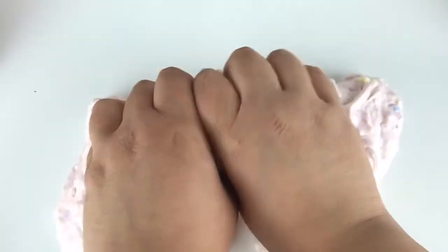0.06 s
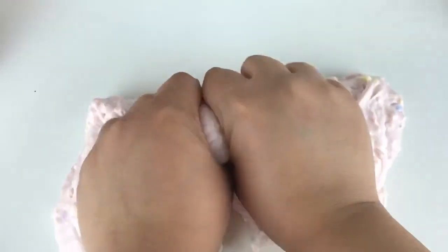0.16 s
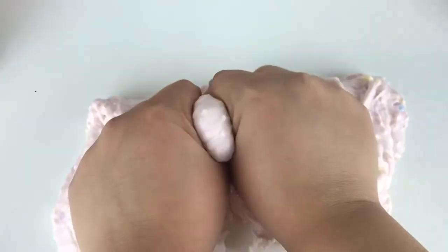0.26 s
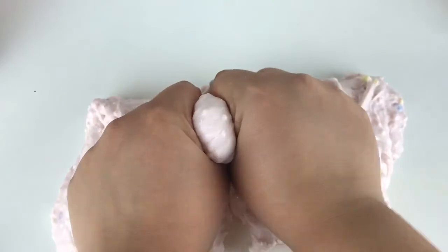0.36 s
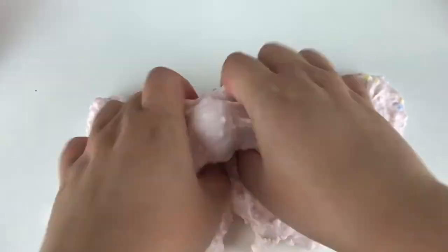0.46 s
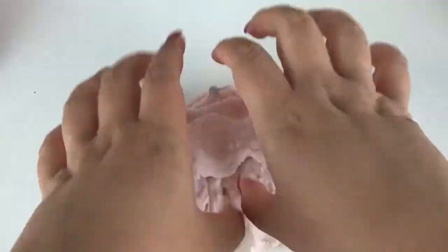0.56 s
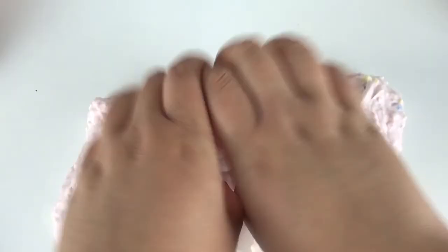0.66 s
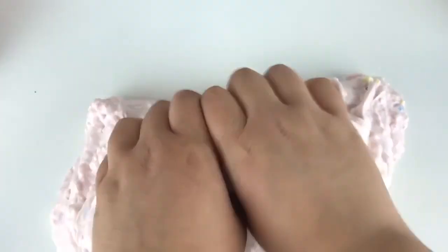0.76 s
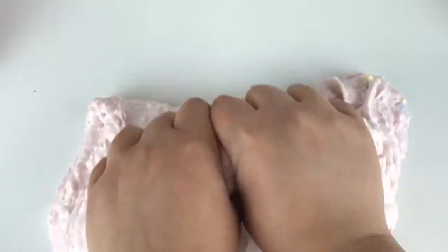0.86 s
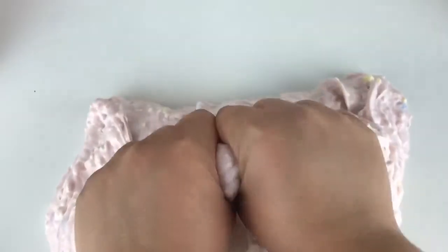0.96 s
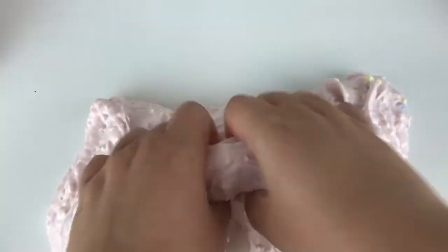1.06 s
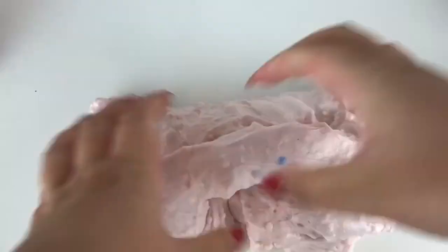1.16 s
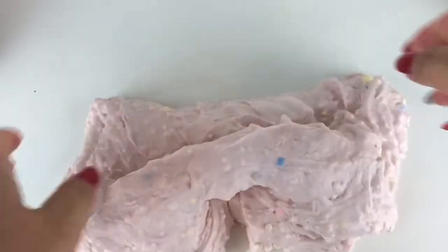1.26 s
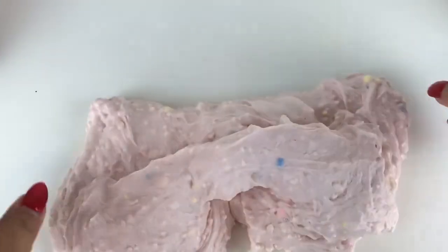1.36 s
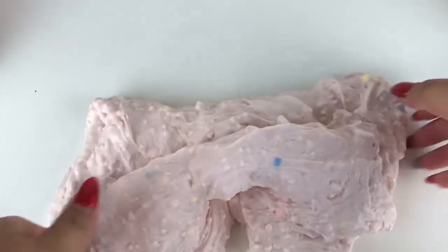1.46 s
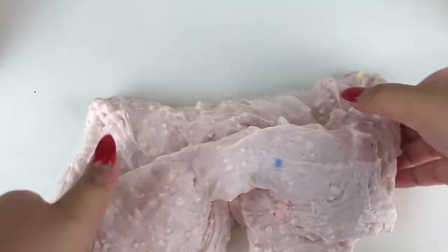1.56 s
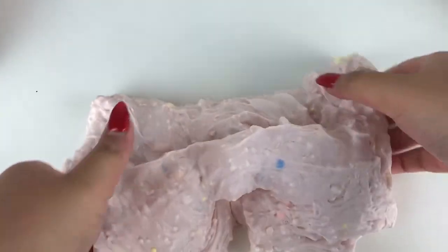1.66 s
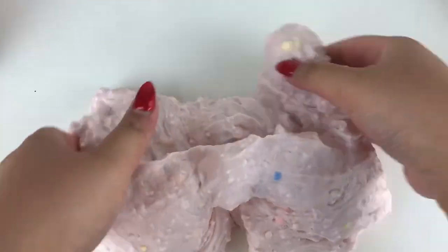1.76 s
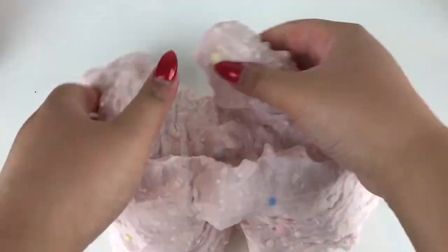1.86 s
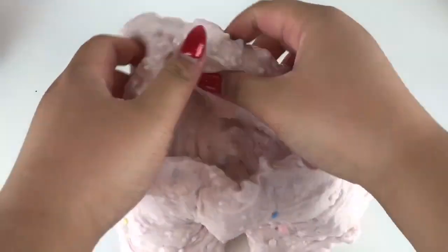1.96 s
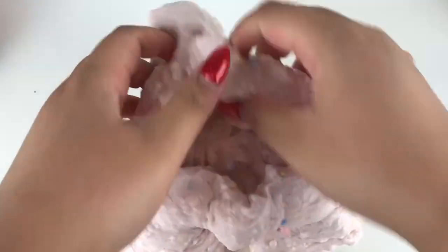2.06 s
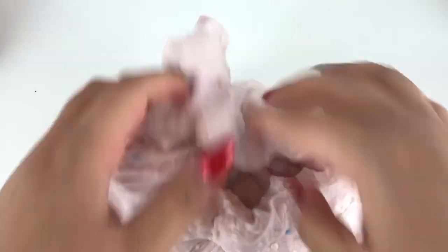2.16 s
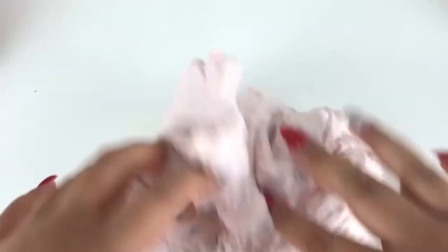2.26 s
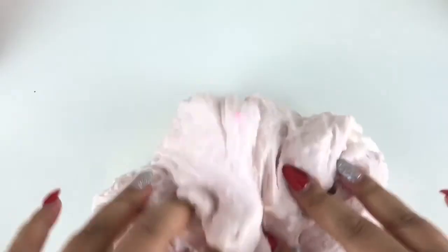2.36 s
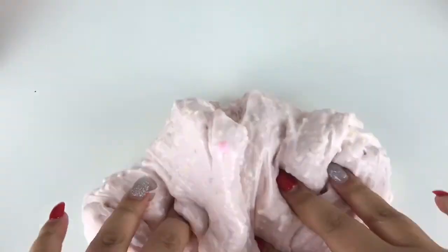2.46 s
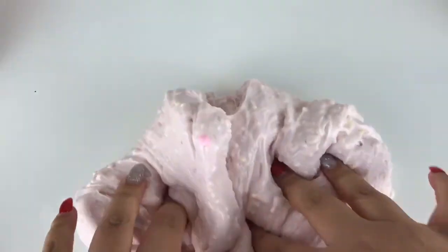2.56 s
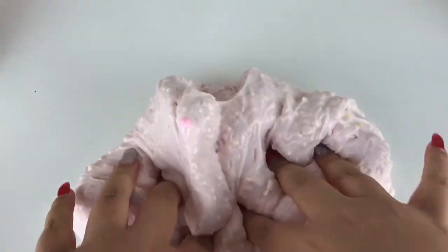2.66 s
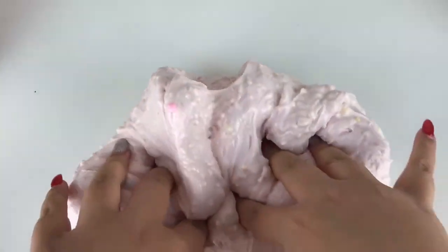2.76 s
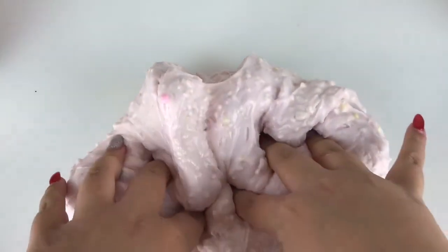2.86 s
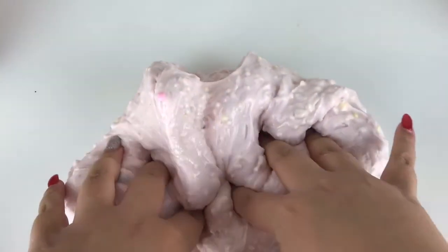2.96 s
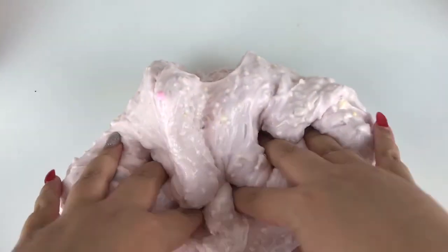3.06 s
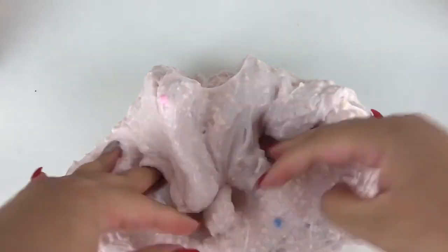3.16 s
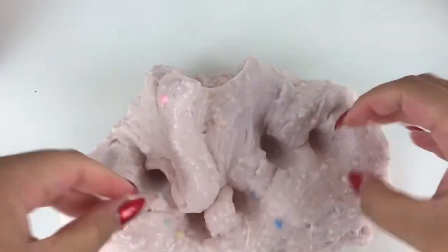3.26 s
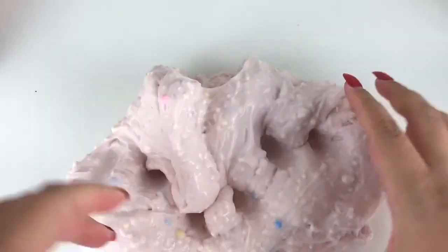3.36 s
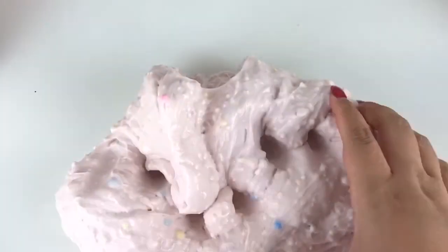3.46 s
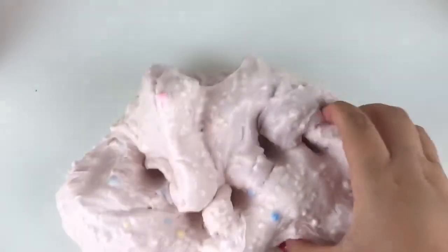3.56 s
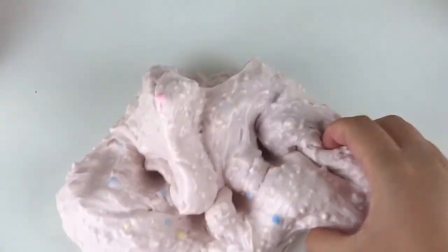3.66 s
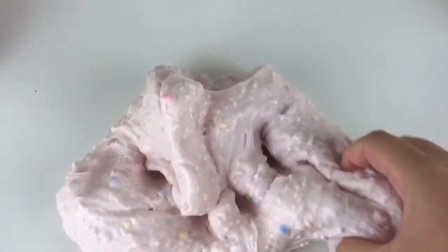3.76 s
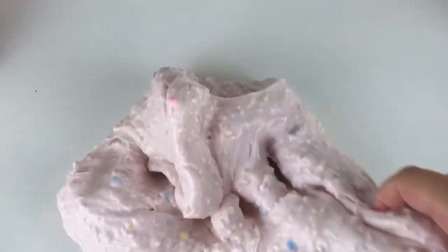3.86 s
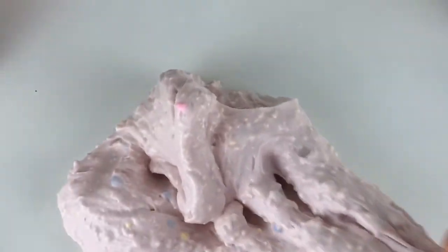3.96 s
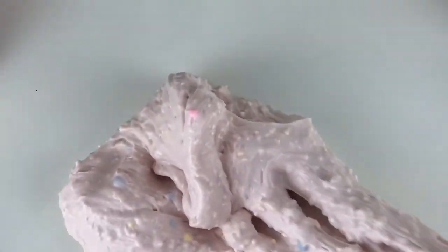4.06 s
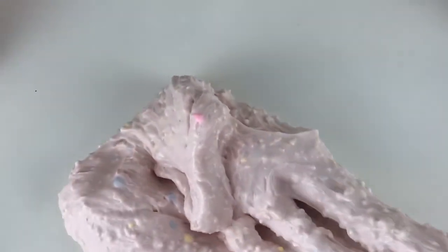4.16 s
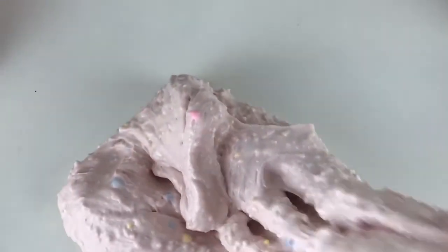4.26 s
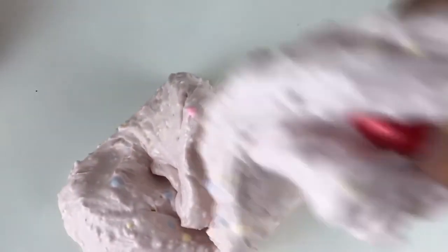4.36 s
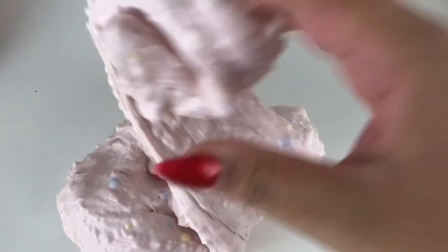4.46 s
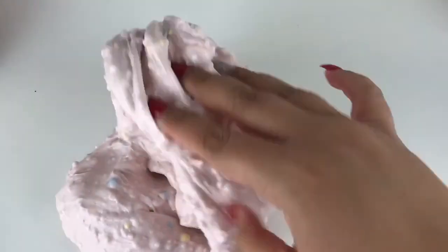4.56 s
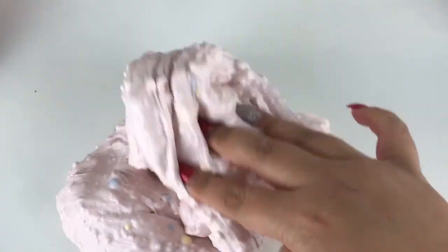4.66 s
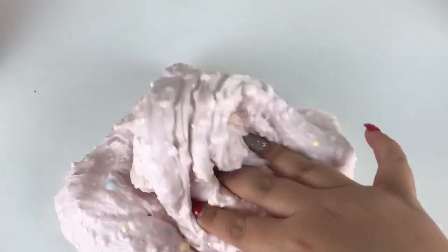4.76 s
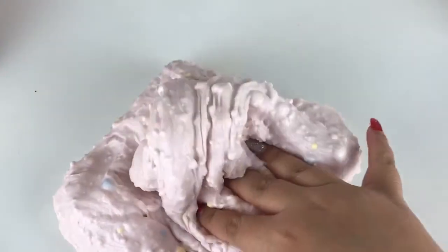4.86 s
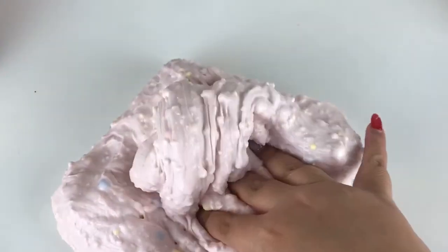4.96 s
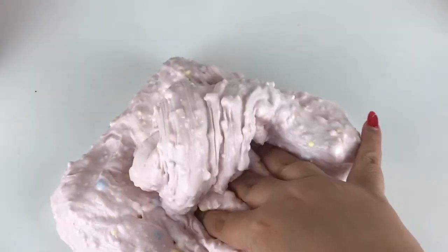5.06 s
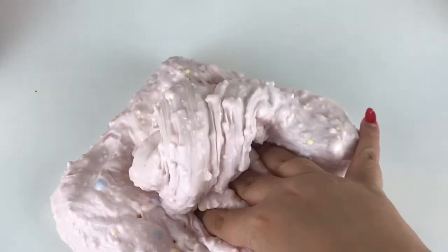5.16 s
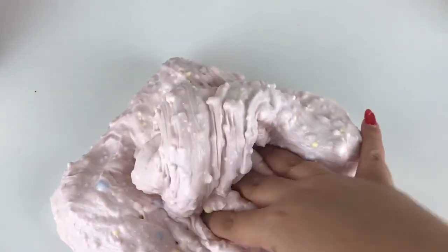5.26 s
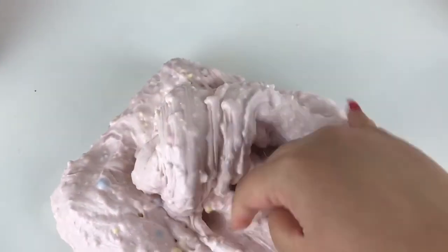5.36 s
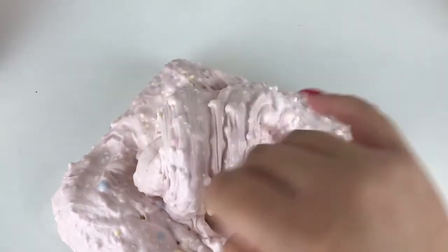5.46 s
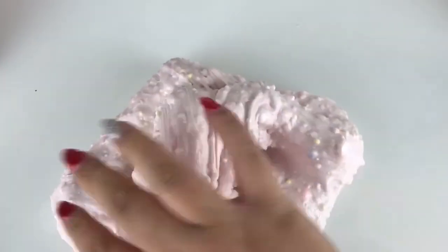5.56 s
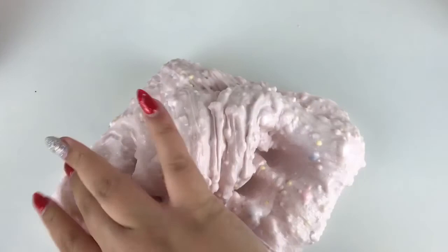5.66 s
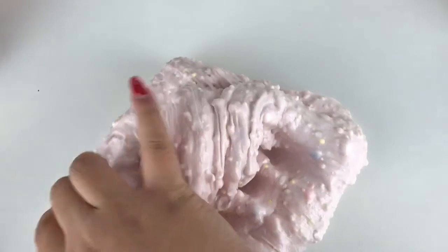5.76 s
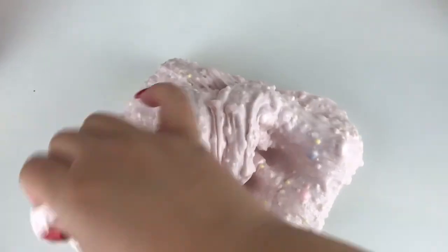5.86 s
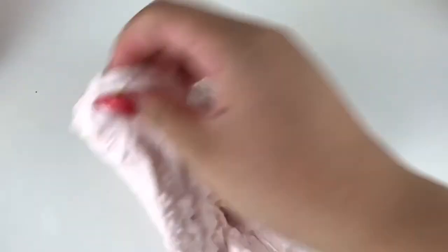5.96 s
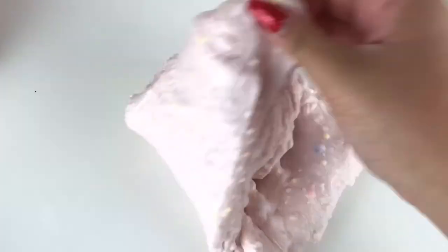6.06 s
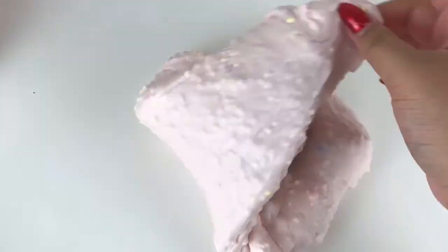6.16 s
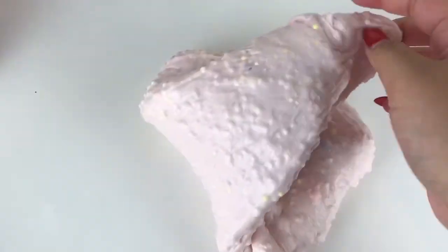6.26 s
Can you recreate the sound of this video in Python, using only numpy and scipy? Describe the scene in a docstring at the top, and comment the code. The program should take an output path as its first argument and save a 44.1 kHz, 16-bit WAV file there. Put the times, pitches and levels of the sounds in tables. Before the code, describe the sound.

Slime is kneaded and pulled in a small indoor room, heard close up. Short squelches and bright, pitched bubble pops come with each press, while lifting and folding gives wet fizzing crackle and dry thread snaps. The busiest, loudest popping is in the first second; later presses are sparser, with dull table knocks beneath. Two barely audible squeaks slip out. Behind lie a short room reverberation, faint hiss, low rumble and hum.

```python
"""Short pitched pops and a wet, fizzing crackle, close to the microphone in a small quiet room: two hands
knead, lift and fold thick beaded slime on a table. Air pockets crack and ring as they burst, sticky threads
snap as the slime peels off skin and table, and swarms of tiny bubbles sound as loudly as each squeeze or pull
makes them. Knuckles thud softly through the table top, and two faint squeaks slip out as the fingers let go.
Behind the hands lie the short reverberation of the room, a low rumble with faint hiss, and mains hum."""
import sys
import numpy as np
from scipy import signal
from scipy.fft import rfft, irfft
from scipy.io import wavfile
from scipy.ndimage import uniform_filter1d

SR = 44100
rng = np.random.default_rng(int(sys.argv[2]) if len(sys.argv) > 2 else 0)


def inscribe(sig):
    """Save sig as 16-bit PCM at rate SR to the path in sys.argv[1].

    A 1-D sig is mono; a 2-D sig holds one channel per row.
    Samples are clipped to [-1, 1] before scaling.
    """
    pcm = np.round(np.clip(np.atleast_2d(sig).T, -1, 1) * 32767)
    wavfile.write(sys.argv[1], SR, pcm.astype(np.int16))


N = 278271

# Hands bearing down on the lump. Each row: start of the hold in seconds, hold in seconds,
# squelch of squeezed bubbles in dB, fine crackle in dB, low gulp in dB.
SQUEEZES = [(0.183, 0.044, -48, -40.5, -53.5), (0.508, 0.033, -44, -44.5, -48.5),
            (1.136, 0.048, -46, -48.5, -54), (3.182, 0.091, -50.5, -49.5, -48),
            (5.392, 0.041, -47.5, -50.5, -46)]
SQUEEZE_RISE_DB_PER_S, SQUEEZE_FALL_DB_PER_S = 454, 270.5  # before and after the hold

# Fingers pulling the slime or peeling off it. Each row: tautest moment in seconds, tightening in seconds,
# slackening in seconds, squelch in dB, fine crackle in dB (both when tautest).
PULLS = [(0.25, .2, .23, -58.5, -55), (0.60, 0.035, 0.027, -55.5, -51.5), (0.80, 0.13, 0.12, -67, -71),
         (0.98, 0.11, 0.21, -62, -59.5), (1.30, 0.088, 0.19, -67.5, -72), (1.711, 0.14, 0.31, -52.5, -52.5),
         (1.91, 0.083, 0.078, -50, -53.5), (2.071, 0.021, 0.045, -61, -54.5),
         (2.16, 0.062, 0.71, -64.5, -67.5), (2.53, 0.076, 0.12, -61.5, -62.5),
         (2.80, 0.17, 0.18, -77, -72.5), (3.86, 0.33, 0.22, -57.5, -54), (4.08, 0.032, .15, -64, -66),
         (4.31, 0.051, 0.045, -71, -74), (4.48, 0.071, 0.036, -57, -55), (4.65, 0.065, 0.33, -63, -69),
         (5.06, 0.064, 0.13, -81, -74.5), (5.33, 0.062, .03, -75, -71.5), (5.58, .05, 0.09, -73, -73.5),
         (5.77, .07, 0.083, -64.5, -58.5), (5.95, 0.094, 0.14, -54.5, -50),
         (6.095, 0.035, 0.041, -54, -53.5), (6.16, .02, 0.14, -64.5, -67)]
SLACK_DB = -8.5  # level at the start and end of a pull, relative to the tautest moment
GRIP_DB_PER_S = 798  # how fast the sound comes and goes outside a pull
PULL_GULP_DB = -5  # low gulp of a pull, relative to its squelch
# a pull sticks and slips, so its sound comes in short fits
SLIPS_PER_S, SLIP_DEPTH_DB = 70, 2.5
# the lump settling by itself
REST_SQUELCH_DB, REST_CRACKLE_DB, REST_GULP_DB = -81, -85, -72

# Spectrum of the squeezed bubbles. Each row: frequency in Hz, relative level per Hz in dB.
SQUELCH_COLOUR = [(150, -16), (500, 0.5), (1100, 1.5), (2000, 0.5), (3500, -3), (5500, -10.5),
                  (9000, -13.5), (16000, -26.5)]
# Spectrum of the fine crackle of peeling. Each row: frequency in Hz, relative level per Hz in dB.
PEEL_COLOUR = [(400, -31), (2000, -4.5), (4000, 1.5), (6500, 1.5), (9000, 1), (10700, -2.5), (12500, 4.5),
               (16000, -1.5)]
# Spectrum of the low gulps of the lump. Each row: frequency in Hz, relative level per Hz in dB.
GULP_COLOUR = [(40, -11), (110, 4), (280, 0), (450, -7), (700, -18), (1500, -38), (5000, -71)]

# Air pockets bursting. Each row: start in seconds, level of the burst before its reflections in dB,
# middle cavity pitch in Hz, ring length in cycles (under one counts as one), skin crack relative to the ring in dB.
POPS = [(0.1215, -23.5, 1630, 0.87, -7.5), (0.1663, -27.5, 1440, 1.1, 3.5), (0.1708, -24, 3420, 3.2, -6),
        (0.1912, -26, 1470, 2.8, -8), (0.1977, -20, 2180, 1.6, -5), (0.1974, -34, 870, 0.89, -15.5),
        (0.2135, -25, 4380, 5.6, -0.5), (0.3775, -20.5, 4200, 3.2, -17), (0.3794, -31.5, 1320, 0.88, 2),
        (0.9739, -11.5, 3276, 3.3, -7.5), (1.102, -38.5, 1660.0, 1.5, -11), (2.2351, -34.5, 1580, 2.2, -12),
        (2.3124, -36.5, 1366, 1.3, 0), (2.3141, -38.5, 705, 0.85, -3), (2.547, -21, 3600, 1.34, -26.5),
        (2.5473, -25, 1180, 0.63, -6.5), (2.548, -23.5, 434, 1.88, -40), (3.1818, -23.5, 3380, 1.5, -4.5),
        (3.2369, -35.5, 2200, 3.1, -6), (3.289, -36.5, 379, 5.3, -19), (3.5534, -25.5, 4090, 1.25, -18),
        (3.6048, -31.5, 492, 1.5, -30), (4.6322, -33.5, 3510, 0.93, -27), (5.3848, -29, 2570, 1.2, -9),
        (5.7377, -29, 3470, 1.46, -13)]

# The strongest sticky threads and tiny blisters snapping. Each row: start in seconds,
# level of the tick before its reflections in dB, centre frequency in Hz.
SNAPS = [(0.225, -41, 6400), (0.2458, -28, 6200), (0.2998, -34, 5750), (0.3768, -25.5, 14000),
         (0.8, -49, 4700), (0.9989, -28.5, 4950), (1.538, -41.5, 3770), (1.5442, -48.5, 4570),
         (1.574, -44, 3100), (1.6358, -30.5, 5100), (1.6608, -38, 5400), (1.6834, -41, 5900),
         (1.694, -34, 4500), (1.7837, -39, 6640), (1.819, -39, 6050), (1.8425, -32, 4300),
         (1.908, -37.5, 6400), (1.9204, -39, 8900), (1.9708, -39.5, 6600), (2.2365, -44.5, 2560),
         (2.376, -48.5, 2700), (2.431, -47, 5800), (2.4954, -40, 5200), (2.502, -45, 8500),
         (2.517, -41, 3270), (2.5813, -33.5, 5400), (2.684, -47, 10600), (2.7397, -55, 4650),
         (3.168, -33.5, 3550), (3.2568, -36, 4800), (3.5143, -41.5, 5000), (3.602, -38.5, 2560),
         (3.634, -39, 9900), (3.6687, -40, 9550), (3.6776, -41, 3800), (3.819, -43, 4840),
         (3.8937, -38, 3560), (3.9328, -39, 6170), (3.963, -38.5, 7200), (4.004, -40, 5000),
         (4.044, -51, 5700), (4.154, -50, 3200), (4.209, -49.5, 2800), (4.3597, -44.5, 7460),
         (4.475, -35, 6240), (4.511, -43.5, 6350), (4.732, -43.5, 7300), (4.751, -42.5, 7400),
         (4.7655, -40, 10800), (4.9196, -55, 6070), (4.9617, -49, 2965), (5.151, -50, 10100),
         (5.3783, -34, 8200), (5.9329, -35.5, 10200), (5.9611, -33, 7400), (6.0635, -37, 10600),
         (6.0885, -40, 6150)]
# lesser threads part at random, their level relative to the fine crackle of the pull
THREADS_PER_S = 32
THREAD_DB, THREAD_SPREAD_DB, THREAD_HZ, THREAD_SPREAD_OCTAVES = 8, 2.5, 4790, 0.8

# Knuckles landing on the table. Each row: start in seconds, gain of the table ring in dB,
# gain of the dull thump of the lump in dB.
THUDS = [(0.196, -43.5, -75), (0.975, -49, -73), (2.549, -37.5, -68.5), (3.21, -46, -42.5),
         (3.295, -46.5, -41), (5.386, -39.5, -40.5), (5.432, -42.5, -41)]
# Resonances of the table top. Each row: frequency in Hz, relative level in dB, time to fade by 60 dB in seconds.
TABLE_MODES = [(134, -4, 0.23), (158.8, -7, 0.35), (225, -6.5, 0.27), (277, 1, 0.22), (358.5, -8.5, 0.48),
               (512, -22, 0.75)]
THUMP_HZ, THUMP_FADE_S = 90, .022

# Faint thin squeaks as the fingers let go. Each row: start in seconds, length in seconds,
# pitch at either end in Hz, peak level in dB.
SQUEAKS = [(1.278, .2, 2450, -67), (5.627, .1, 1280, -71)]
SQUEAK_BEND = 0.061  # share by which the pitch arches upward

# Reverberation of the room. Each row: band centre in Hz, time to fade by 60 dB in seconds,
# gain of the noise tail before its band filter in dB.
ROOM_BANDS = [(250, 0.71, -16), (694, 0.19, -11.5), (1780, 0.13, -10.5), (3847, 0.2, -13.5),
              (8100, 0.26, -24.5), (14000, 0.54, -16.5)]
# Spectrum of the empty room. Each row: frequency in Hz, relative level per Hz in dB.
ROOM_TONE = [(12, -40), (20, -15.5), (74, 2), (107, -0.5), (177, -6.5), (301, -19.5), (410, -38.5),
             (1030, -35), (1290, -25.5), (1400, -34.5), (2260, -36.5), (2460, -39), (2670, -46.5),
             (14300, -56), (16000, -57)]
ROOM_TONE_DB = -65  # rms
# Mains hum. Each row: frequency in Hz, rms level in dB.
HUM = [(60, -68.5), (118, -66)]
TOP_HZ = 16000  # upper limit of the recorder


def kneading(gains):
    """Squeezing squelches, peeling fizzes, and the lump itself gulps under the hands."""
    squelch = bubbles(per_s=2400, low_hz=412, high_hz=7400, cycles=1.5, spread_db=4.5)
    peel = bubbles(per_s=2800, low_hz=1814, high_hz=16600, cycles=0.59, spread_db=-0.5)
    gulps = bubbles(per_s=530, low_hz=104, high_hz=920, cycles=1.2, spread_db=2.0)
    squelch_gain, peel_gain, gulp_gain = gains
    return (squelch_gain * unit(colour(squelch, SQUELCH_COLOUR))
            + peel_gain * unit(colour(peel, PEEL_COLOUR))
            + gulp_gain * unit(colour(gulps, GULP_COLOUR)))


def bubbles(per_s, low_hz, high_hz, cycles, spread_db):
    """A swarm of tiny bursts, each a fading sine with its own moment, pitch and size; rms 1."""
    t = np.arange(400) / SR
    when, size, tone = rng.random((int(per_s * N / SR), 3)).T
    hz = low_hz * (high_hz / low_hz) ** tone[:, None]
    gain = undb(spread_db * np.minimum(-np.log(1 - size), 4))
    ring = np.sin(2 * np.pi * hz * t) * np.exp(-hz * t / cycles)
    grains = gain[:, None] * np.sqrt(hz) * ring
    places = (when * N).astype(int)[:, None] + np.arange(len(t))
    swarm = np.bincount(places.ravel(), grains.ravel(), N + len(t))[:N]
    # small bubbles outnumber large ones: tilt towards an even spectrum per Hz
    return unit(colour(swarm, [(10, -33), (20000, 0)]))


def squeezing():
    """Gains of squelch, crackle and gulp: pressure builds, holds and lets go at steady rates in dB."""
    t, gains = np.arange(N) / SR, np.zeros((3, N))
    for s, hold, squelch_db, crackle_db, gulp_db in SQUEEZES:
        before_s, after_s = np.maximum(s - t, 0), np.maximum(t - s - hold, 0)
        fade_db = SQUEEZE_RISE_DB_PER_S * before_s + SQUEEZE_FALL_DB_PER_S * after_s
        gains += undb([[squelch_db], [crackle_db], [gulp_db]]) * undb(-fade_db)
    return gains


def pulling():
    """Gains of squelch, crackle and gulp: each pull grows louder until the slime is taut, then slackens."""
    t, gains = np.arange(N) / SR, np.zeros((3, N))
    for taut, tighten_s, slacken_s, squelch_db, crackle_db in PULLS:
        start, end = taut - tighten_s, taut + slacken_s
        slack = np.interp(t, [start, taut, end], [1, 0, 1])
        outside_s = np.abs(t - np.clip(t, start, end))
        tension = undb(SLACK_DB * slack - GRIP_DB_PER_S * outside_s)
        levels = undb([[squelch_db], [crackle_db], [squelch_db + PULL_GULP_DB]])
        gains = np.maximum(gains, levels * tension)  # where pulls overlap, the louder is heard
    return gains


def stick_slip():
    """Gain that jumps to a new random level at each slip, slightly smoothed; rms 1."""
    slips = np.cumsum(rng.random(N) < SLIPS_PER_S / SR)
    size = np.clip(rng.standard_normal(N), -2, 2)[slips]
    return unit(uniform_filter1d(undb(SLIP_DEPTH_DB * size), size=64))


def pops():
    """The skin of a pocket cracks and its air rings for a few cycles, rising as the hole widens."""
    out, t = np.zeros(N), np.arange(2048) / SR
    for s, db, hz, cycles, crack_db in POPS:
        age = t * hz / max(cycles, 1)
        pitch = hz * (1 + 0.1 * (np.minimum(age, 1) - .5))
        envelope = np.exp(-1.5 * age) * (1 - np.exp(-t * hz / 0.15))
        ring = np.sin(2 * np.pi * np.cumsum(pitch) / SR) * envelope
        skin = crack(np.sqrt(hz * 11000), spread=1.14, fade_s=0.0015)
        pop = burst(burst(ring) + undb(crack_db) * skin)
        add(out, s, undb(db) * scatter(pop, share_db=-3.5, lag_s=.0017, fade_s=0.0027))
    return out


def snaps(peeling):
    """Threads part with a dry broad tick: the strong ones, and lesser ones that follow the peeling level."""
    out = np.zeros(N)
    count = int(THREADS_PER_S * N / SR)
    places = rng.integers(0, N, count)
    chance = np.clip(rng.standard_normal((count, 2)), -2, 2)
    threads = [(s, undb(db), hz) for s, db, hz in SNAPS]
    for i, (size, tone) in zip(places, chance):
        gain = peeling[i] * undb(THREAD_DB + THREAD_SPREAD_DB * size)
        threads.append((i / SR, gain, THREAD_HZ * 2 ** (THREAD_SPREAD_OCTAVES * tone)))
    for s, gain, hz in threads:
        tick = crack(hz, spread=1.85, fade_s=0.00033)
        add(out, s, gain * scatter(tick, share_db=-2.0, lag_s=0.0011, fade_s=0.0032))
    return out


def crack(hz, spread, fade_s, order=1):
    """A film of slime parts: a very short fading noise in a band around hz."""
    t = np.arange(2048) / SR
    return burst(band(rustle(np.exp(-t / fade_s)), hz, spread, order=order))


def scatter(x, share_db, lag_s, fade_s):
    """A click bounces between palms, folds and table within a few milliseconds."""
    t = np.arange(len(x)) / SR
    paths = rustle((t > lag_s) * np.exp(-np.abs(t - lag_s) / fade_s))
    return x + undb(share_db) * burst(signal.fftconvolve(x, paths)[:len(x)])


def thuds():
    """Blows cushioned by the slime thump dully and ring the low modes of the table."""
    out, t = np.zeros(N), np.arange(SR // 2) / SR
    ring = sum(undb(db - 60 * t / t60) * np.sin(2 * np.pi * hz * t) for hz, db, t60 in TABLE_MODES)
    thump = np.sin(2 * np.pi * THUMP_HZ * t) * np.exp(-t / THUMP_FADE_S)
    cushion = 1 - np.exp(-t / .0028)  # softens the onset
    for s, ring_db, thump_db in THUDS:
        add(out, s, cushion * (undb(ring_db) * ring + undb(thump_db) * thump))
    return out


def squeaks():
    """A thin tone that swells and fades, its pitch arching with its strength."""
    out = np.zeros(N)
    for s, length, hz, db in SQUEAKS:
        arch = np.sin(np.linspace(0, np.pi, int(length * SR)))
        pitch = hz * (1 + SQUEAK_BEND * arch ** 2)
        add(out, s, undb(db) * arch * np.sin(2 * np.pi * np.cumsum(pitch) / SR))
    return out


def room(x, early_db, early_s):
    """Broad early reflections and a soft tail in bands, all arriving 6 ms after the direct sound."""
    t = np.arange(SR // 2) / SR
    arrived = t > .006
    early = rustle(arrived * np.exp(-t / early_s))
    response = undb(early_db) * early / np.linalg.norm(early)
    for hz, t60, db in ROOM_BANDS:
        fade = arrived * np.exp(-np.log(1000) * t / t60)
        noise = band(rng.standard_normal(len(t)), hz, 1.41, order=2)
        response = response + undb(db) * noise * fade / np.linalg.norm(fade)
    return x + signal.fftconvolve(x, response)[:N]


def room_tone():
    """The empty room: coloured noise as a low rumble with faint hiss, and steady sines as mains hum."""
    t = np.arange(N) / SR
    hum = sum(np.sqrt(2) * undb(db) * np.sin(2 * np.pi * (hz * t + rng.random())) for hz, db in HUM)
    return hum + undb(ROOM_TONE_DB) * unit(colour(rng.standard_normal(N), ROOM_TONE))


def rustle(envelope):
    """Short noise under an envelope, with a nearly even spectrum so that no pitch stands out."""
    x = rng.standard_normal(len(envelope)) * envelope
    for _ in range(3):
        x = irfft(np.exp(1j * np.angle(rfft(x))), len(x))  # keep the phases, level the spectrum
        x = np.clip(x / np.max(np.abs(x)), -envelope, envelope)
    return x


def colour(x, points):
    """Filter by (Hz, dB) points joined by straight lines over log frequency."""
    hz, db = np.transpose(points)
    f = np.maximum(np.fft.rfftfreq(len(x), 1 / SR), 1)
    return irfft(rfft(x) * undb(np.interp(np.log(f), np.log(hz), db)), len(x))


def band(x, hz, spread, order=1):
    """Band-pass from hz / spread to hz * spread, kept below half the sample rate."""
    spread = max(spread, 1.1)
    edges = [min(hz / spread, .4 * SR), min(hz * spread, .45 * SR)]
    return signal.sosfilt(signal.butter(order, edges, "bandpass", fs=SR, output="sos"), x)


def undb(db):
    """Decibels to gain."""
    return 10 ** (np.asarray(db) / 20)


def unit(x):
    """Scale to rms 1."""
    return x / np.sqrt(np.mean(x ** 2))


def burst(x):
    """Scale a short sound to the energy of one millisecond at rms 1."""
    return x * np.sqrt(SR / 1000 / np.sum(x ** 2))


def add(track, s, sound):
    """Mix a sound into the track at s seconds."""
    i = max(int(s * SR), 0)
    track[i:i + len(sound)] += sound[:max(N - i, 0)]


def scene():
    """Squeezes and pulls drive the bubbles, pulls the lesser threads; all the slime sounds share the room."""
    pull = pulling()
    rest = undb([[REST_SQUELCH_DB], [REST_CRACKLE_DB], [REST_GULP_DB]])
    gains = np.sqrt(squeezing() ** 2 + (pull * stick_slip()) ** 2 + rest ** 2)
    slime = kneading(gains) + pops() + snaps(peeling=pull[1]) + thuds() + squeaks()
    return (room(slime, early_db=-14.0, early_s=0.03) + room_tone())[None]


def record(dry):
    """The recorder cuts the top with a steep low-pass."""
    return signal.sosfilt(signal.ellip(8, .2, 70, TOP_HZ, fs=SR, output="sos"), dry)


dry = scene()
out = record(dry)
inscribe(out)
```